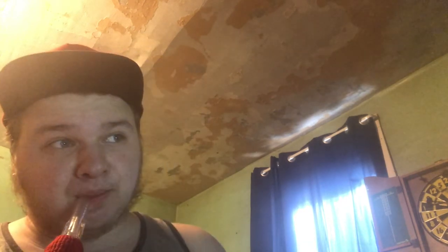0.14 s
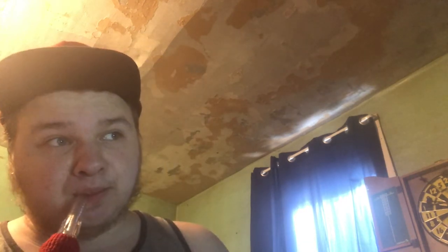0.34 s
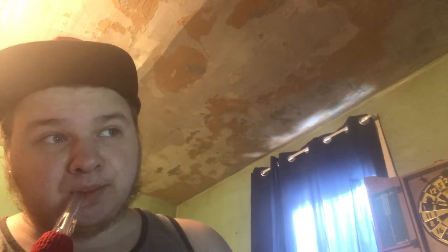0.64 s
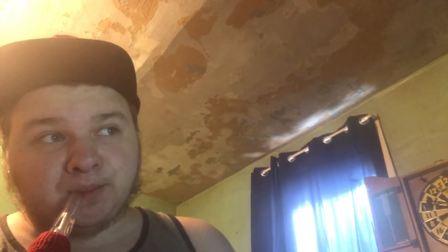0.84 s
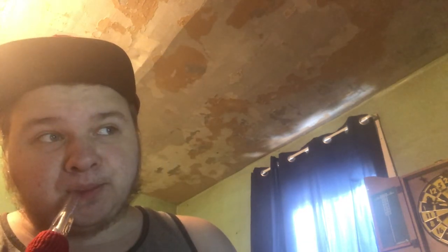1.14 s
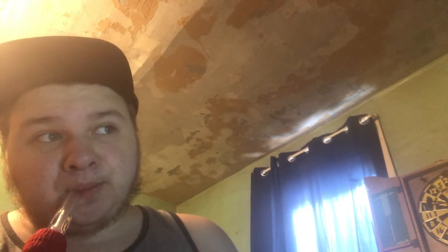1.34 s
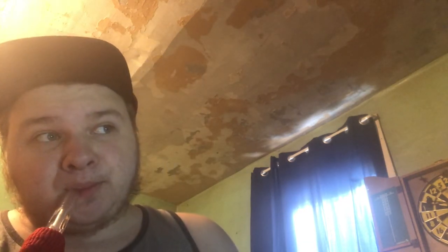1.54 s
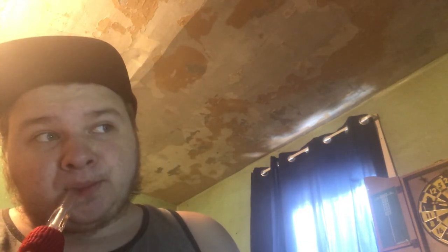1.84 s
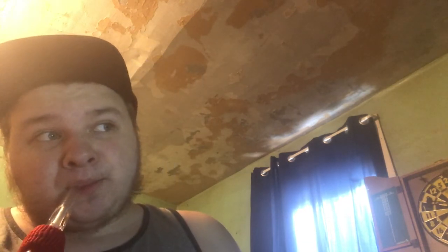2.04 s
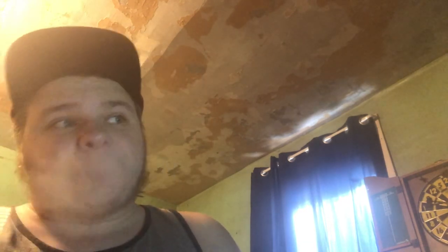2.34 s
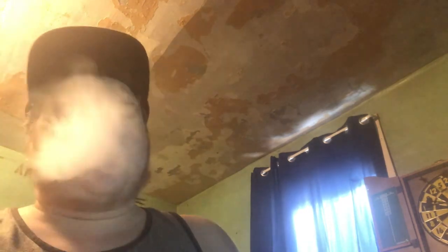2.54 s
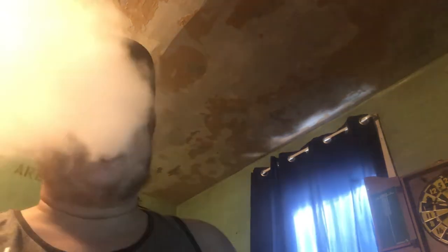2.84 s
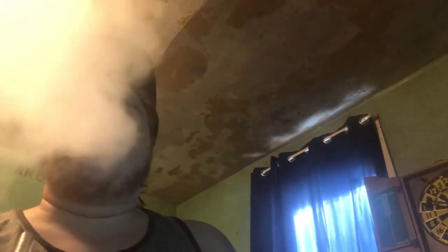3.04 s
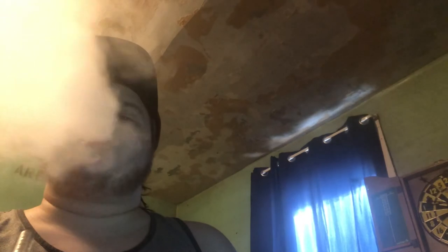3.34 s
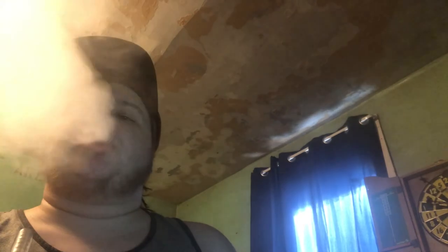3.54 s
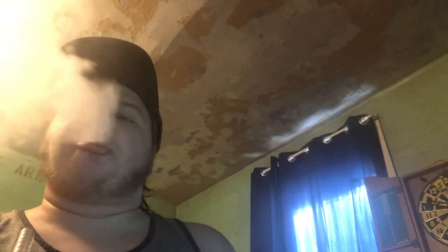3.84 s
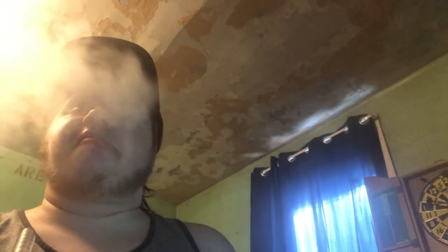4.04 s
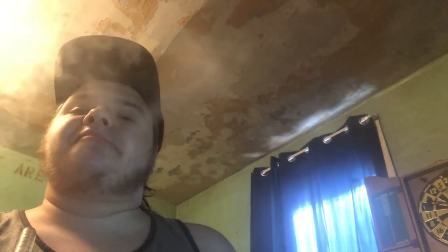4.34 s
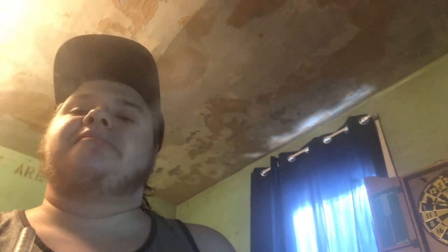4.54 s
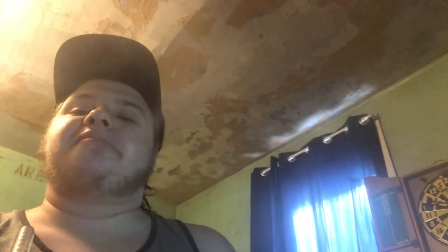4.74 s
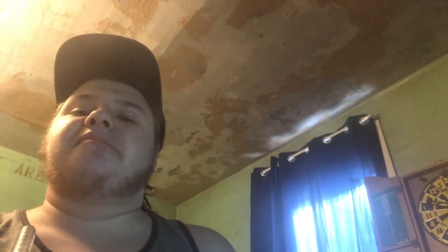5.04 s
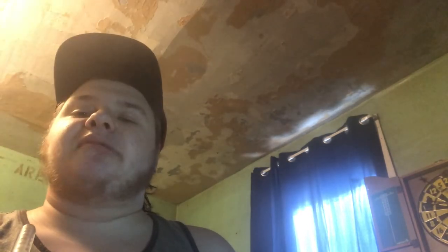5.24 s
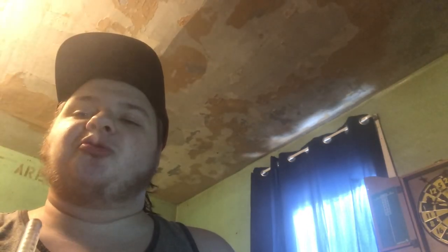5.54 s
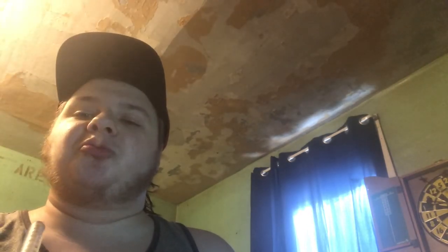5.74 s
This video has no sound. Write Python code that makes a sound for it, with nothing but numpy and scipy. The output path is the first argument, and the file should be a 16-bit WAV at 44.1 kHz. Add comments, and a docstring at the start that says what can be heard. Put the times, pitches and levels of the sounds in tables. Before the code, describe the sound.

Quick hollow gurgling pops as air is pulled through a water pipe, a faint hose bump, then only a low droning fan.

```python
"""A hookah beside a fan

Air is drawn through a hookah for two seconds: about fourteen times a second a bubble breaks from the stem.
Each pops with a short rising note that rings the vase, and the water throbs; small drops spatter in between.
The mouthpiece ticks faintly and the hose is put down with a soft bump, a short sine of falling pitch.
A fan hums with wavering sines and rushes with shaped noise in the small room throughout."""
import sys
import numpy as np
from scipy import signal
from scipy.fft import rfft, irfft, next_fast_len
from scipy.io import wavfile
from scipy.ndimage import map_coordinates

SR = 44100
rng = np.random.default_rng(int(sys.argv[2]) if len(sys.argv) > 2 else 0)


def transcribe(signal):
    """Save signal, clipped to [-1, 1], as a 16-bit WAV file at the path in sys.argv[1]."""
    frames = np.atleast_2d(signal).T
    limited = np.clip(frames, -1, 1)
    pcm = np.round(limited * 32767).astype(np.int16)
    wavfile.write(sys.argv[1], SR, pcm)


N = 260190  # length in samples
DRAW_END_S = 1.9  # from here the suction lets go


def amp(db):
    """Turn decibels into a gain."""
    return 10 ** (np.asarray(db) / 20)


def unit(x):
    """Scale x to an average (rms) strength of 1."""
    return x / np.sqrt(np.mean(x ** 2) + 1e-20)


def along(points, hz):
    """Read a curve of (Hz, value) points at any frequency, on a log axis."""
    f, v = np.transpose(points)
    return np.interp(np.log(hz + 1), np.log(f + 1), v)


def wobble(rate):
    """Draw a smooth random curve through `rate` random points a second."""
    knots = rng.standard_normal(int(N * rate / SR) + 4)
    return map_coordinates(knots, [np.arange(N) * rate / SR])


def filtered(x, response):
    """Multiply the spectrum of x by a response that depends on frequency."""
    size = next_fast_len(len(x) + SR // 4)
    spectrum = rfft(x, size) * response(np.fft.rfftfreq(size, 1 / SR))
    return irfft(spectrum, size)[:len(x)]


def coloured(x, spectrum):
    """Shape x with a curve of (Hz, dB) points, then scale it to rms 1."""
    return unit(filtered(x, lambda hz: amp(along(spectrum, hz))))


def add(track, s, sound):
    """Mix a sound into the track from time s in seconds."""
    part = track[max(round(s * SR), 0):][:len(sound)]
    part += sound[:len(part)]


def ring(hz, db, t60, attack, glide=0):
    """Sum fading sines with a soft start; t60 is the time to fall 60 dB, glide the relative pitch rise a second."""
    t = np.arange(SR // 3) / SR
    hz, db, t60 = (np.reshape(v, (-1, 1)) for v in (hz, db, t60))
    fade = amp(db - 60 * t / t60)
    modes = fade * np.sin(2 * np.pi * hz * (t + glide * t * t / 2))
    return modes.sum(axis=0) * (1 - np.exp(-t / attack))


def fan(sway=0.16, flutter_db=0.61, tone_sway=0.69, tone_flutter_db=1.5, low_db=-47, air_db=-48.0,
        low_edge_hz=650, blade_hz=168.4):
    """The blades hum a strong wavering tone over weak unsteady motor tones and the rush of moved air."""
    # Level of the hum, with slow drifts and a few quick dips. Each row: time in seconds, level in dB rms.
    hum_levels = [(0, -37), (.3, -33), (.4, -40), (.65, -34), (1.5, -34.5), (2.0, -33.5), (4.0, -35),
                  (4.15, -32.5), (4.7, -36), (4.9, -32.5), (5.65, -33.5), (5.9, -35)]
    # Weaker tones of the fan and its motor. Each row: pitch in Hz, level in dB rms.
    weak_tones = [(120, -61.5), (127, -58.5), (210.3, -60.5), (378.7, -58), (505, -64), (673, -77.5),
                  (757.5, -71), (841.5, -80), (1010, -68.5), (1136.3, -57.5), (1346.5, -63.5),
                  (1515, -67.5)]
    # Shape of the low rumble. Each row: frequency in Hz, relative level in dB per Hz.
    low_spectrum = [(20, -36), (30, -27), (45, -4.5), (70, 0.5), (90, 6), (135, 7.5), (172, 18.5), (195, 8),
                    (235, 8), (260, 5), (390, 3.5), (435, -3.5), (495, 6.5), (540, -6.5), (575, 6.5),
                    (640, -31.5)]
    # Shape of the air rush. Each row: frequency in Hz, relative level in dB per Hz.
    air_spectrum = [(500, -42), (640, -3), (745, -9.5), (790, -1.5), (890, 5), (1000, -3.5), (1270, -2),
                    (1500, -7.5), (1800, -11), (2050, -17), (3000, -17.5), (4500, -19), (5200, -24.5),
                    (7000, -26.5), (8200, -30.5), (10000, -31.5), (13000, -38), (15700, -44)]
    t = np.arange(N) / SR
    turn = 2 * np.pi * t
    blade_db = np.interp(t, *np.transpose(hum_levels)) + flutter_db * wobble(16)
    blade = amp(blade_db) * np.sin(blade_hz * turn + sway * wobble(8))
    tones = np.zeros(N)
    for hz, db in weak_tones:
        level = amp(db + tone_flutter_db * wobble(4.89))
        tones += level * np.sin(hz * turn + tone_sway * wobble(4))
    rumble = coloured(rng.standard_normal(N), low_spectrum)
    rumble = filtered(rumble, lambda hz: 1 / (1 + (hz / low_edge_hz) ** 20))
    air = coloured(rng.standard_normal(N), air_spectrum)
    # a sine of peak sqrt(2) has rms 1
    return np.sqrt(2) * (blade + tones) + amp(low_db) * rumble + amp(air_db) * air


def draw(peak_s=1.13, swell_db_per_s=4.5, release_db_per_s=80):
    """The suction swells to a peak, eases off, then lets go: dB relative to a full peak, for each sample."""
    t = np.arange(N) / SR
    swell_db = -swell_db_per_s * np.abs(t - peak_s)
    return swell_db - release_db_per_s * np.maximum(t - DRAW_END_S, 0)


def churn(rate=350, level_db=-45):
    """Small bubbles and drops spatter in the vase: about `rate` random clicks a second, shaped and faded by the draw."""
    # Shape of the spatter. Each row: frequency in Hz, relative level in dB per Hz.
    spatter_spectrum = [(35, -28), (60, -15), (95, -4.5), (150, 10.5), (250, 3.5), (320, -9.5), (420, -15),
                        (510, -8), (680, -4), (750, -21), (870, 2), (1050, -20), (1200, -16), (1600, -20),
                        (2100, -36), (3000, -36), (3500, -18), (4000, -32), (10000, -65)]
    drops = (rng.random(N) < rate / SR) * rng.standard_normal(N)
    return amp(draw() + level_db) * coloured(drops, spatter_spectrum)


def blips(count=75, level_db=-39, pitch_hz=950, spread=0.283, cycles=22, rise=6):
    """Tiny bubbles at random times each sound one rising note that fades 60 dB in about `cycles` swings."""
    out, draw_db = np.zeros(N), draw()
    starts = rng.uniform(0, DRAW_END_S, count)
    for s, size in zip(starts, rng.standard_normal(count)):
        hz = pitch_hz * np.exp(spread * size)
        note = ring(hz, level_db + draw_db[int(s * SR)], cycles / hz, attack=0.0016, glide=rise)
        add(out, s, note)
    return out


def bubble_train(jitter_s=.006, size_db=-0.5, spread=0.076, beat_s=.069, shed_share=.6, shed_db=-11):
    """Bubbles break off near a beat: big ones, small ones on the beats between, and weaker ones shed behind."""
    # The big bubbles. Each row: start in seconds, pop level in dB, own pitch in Hz,
    # brightness in dB before the offset shared by all pops.
    big_bubbles = [(0.014, -17.5, 913, -20), (0.086, -25.5, 825, -18.5), (0.152, -24.5, 930, -21),
                   (0.307, -19, 886, -13.5), (0.349, -33, 926, -28), (0.388, -27, 1014, -29),
                   (0.462, -24.5, 900, -35), (0.534, -25.5, 840, -21), (0.6, -23.5, 543, -17.5),
                   (0.664, -34, 830, -27), (0.73, -26.5, 880, -17), (0.796, -29.5, 905, -21),
                   (0.863, -24.5, 850, -30), (0.982, -27, 872, -21), (0.998, -30.5, 920, -20),
                   (1.048, -32.5, 848, -16), (1.117, -21, 920, -23), (1.188, -31, 1040, -29),
                   (1.28, -24.5, 887, -27), (1.387, -19, 907, -33), (1.459, -21, 910, -29),
                   (1.471, -25.5, 920, -26), (1.523, -30, 976, -21), (1.63, -32.5, 859, -16),
                   (1.676, -28.5, 890, -21), (1.81, -27, 890, -21), (1.887, -24, 905, -11),
                   (2.002, -30, 864, -14), (2.113, -32, 900, -22)]
    small_db, small_hz, small_edge_db = -33.5, 913, -24
    rows, draw_db = list(big_bubbles), draw()
    chances = rng.standard_normal((len(big_bubbles), 4, 3))
    for (start, *_), (end, *_), chance in zip(big_bubbles, big_bubbles[1:], chances):
        steps = max(round((end - start) / beat_s), 1)
        beats = np.linspace(start, end, steps + 1)[1:-1]
        for s, (late, size, shift) in zip(beats, chance):
            db = small_db + draw_db[int(s * SR)] + size_db * size
            rows.append((s + jitter_s * late, db, small_hz * np.exp(spread * shift), small_edge_db))
    lucks = rng.random((len(big_bubbles), 2))
    for (s, db, *_), (luck, late), shift in zip(big_bubbles, lucks, rng.standard_normal(len(big_bubbles))):
        if luck < shed_share:
            shed_s = s + np.interp(late, [0, 1], (.012, .026))  # 12 to 26 ms behind
            rows.append((shed_s, db + shed_db, small_hz * np.exp(spread * shift), small_edge_db))
    return rows


def muffled(x, edge_hz=1950):
    """The closed vase lets little treble out."""
    return signal.sosfilt(signal.butter(6, edge_hz, fs=SR, output="sos"), x)


def pops(bubbles, level_db=-5, edge_db=16.0, detune=0.019, scatter_db=1, own_db=2, own_t60=0.032, rise=4,
         snap_db=-2, snap_hz=1580, snap_t60=0.0069, splash_db=-31, splash_t60=0.04):
    """Each bubble bursts with a snap and a little splash, sounds its own short rising note and rings the vase."""
    # Air space of the vase. Each row: pitch in Hz, relative level in dB, time to fall 60 dB in seconds.
    vase_modes = [(272, -6.5, 0.016), (308, -6, 0.059), (515, -14, 0.22), (582, 3.5, 0.024),
                  (690, 5.5, 0.025), (852, -7, 0.072), (905, -3.5, 0.043), (1002, -7, 0.079),
                  (1255, -4, 0.034), (1560, -8, 0.036), (1770, -16, 0.044)]
    # low modes of a pop of usual strength, relative to its main note
    usual_db, hollow_base_db, hollow_per_db, hollow_per_bright = -26, -6, -.5, 0.15
    spray_spectrum = [(500, -7), (1800, 13), (3200, -9), (5000, -30), (9000, -55)]  # (Hz, relative dB)
    out, t = np.zeros(N), np.arange(SR // 3) / SR
    hz, db, t60 = np.transpose(vase_modes)
    chance = rng.standard_normal((len(bubbles), 2, len(vase_modes)))
    for (s, peak_db, pitch_hz, high_db), (shift, strength) in zip(bubbles, chance):
        note = ring(pitch_hz, own_db, own_t60, attack=0.0023, glide=rise)
        # weak pops favour the low modes, as bright ones do a little; bright ones also lift the high modes
        bright_db = high_db + edge_db
        hollow_db = hollow_base_db + hollow_per_db * (peak_db - usual_db) + hollow_per_bright * bright_db
        colour = along([(680, hollow_db), (830, 0), (1100, 0), (1500, bright_db)], hz)
        # the moving water shifts every mode a little
        mode_hz = hz * (1 + detune * shift)
        mode_db = level_db + db + colour + scatter_db * strength
        vase = ring(mode_hz, mode_db, t60, attack=0.00058)
        snap = ring(snap_hz, snap_db + bright_db, snap_t60, attack=0.0027)
        spray = coloured(rng.standard_normal(len(t)), spray_spectrum)
        splash = amp(splash_db + bright_db - 60 * t / splash_t60) * spray
        add(out, s, amp(peak_db) * (muffled(note + vase + snap) + splash))
    return out


def gulps(bubbles, level_db=-35, follow=0.32, detune=0.0885):
    """Water falls back behind each bubble and sets trapped air throbbing, more after a big one and in a hard draw."""
    # Rocking water and the air above it. Each row: pitch in Hz, relative level in dB,
    # time to fall 60 dB in seconds.
    water_modes = [(105.4, 2.5, 0.25), (141, 1.5, 0.16), (169.7, 13.5, 0.13), (248, 10.5, 0.1)]
    out, draw_db = np.zeros(N), draw()
    hz, db, t60 = np.transpose(water_modes)
    shifts = rng.standard_normal((len(bubbles), len(water_modes)))
    for (s, peak_db, *_), shift in zip(bubbles, shifts):
        gain = amp(level_db + follow * peak_db + draw_db[int(s * SR)])
        add(out, s, gain * ring(hz * (1 + detune * shift), db, t60, attack=0.006))
    return out


def hose(bump_s=2.19, bump_hz=100, end_hz=50, bump_db=-37, bump_length=0.059, pivot_hz=11600):
    """The mouthpiece ticks with fading bands of noise and the hose gives one soft bump of falling pitch."""
    # Small ticks. Each row: start in seconds, level in dB, brightness in dB per octave.
    tick_rows = [(1.06, -63, -14), (1.33, -67, -14), (2.069, -56, 5), (2.096, -61, 6), (2.111, -64, -8),
                 (2.457, -66, 4), (2.464, -63, 4)]
    # What the mouthpiece rings with. Each row: centre in Hz, width to either side in Hz,
    # relative level in dB, time to fall 60 dB in seconds.
    mouthpiece_bands = [(7870, 280, -8.5, 0.19), (11600, 1600, -1, .035), (14400, 400, -14, .06)]
    out, t = np.zeros(N), np.arange(SR // 4) / SR
    for s, tick_db, tilt in tick_rows:
        for centre_hz, width_hz, db, t60 in mouthpiece_bands:
            noise = rng.standard_normal(len(t))
            grain = filtered(noise, lambda hz: 1 / (1 + ((hz - centre_hz) / width_hz) ** 2))
            tilt_db = tilt * np.log2(centre_hz / pivot_hz)
            add(out, s, amp(tick_db + db + tilt_db - 60 * t / t60) * unit(grain))
    progress = np.minimum(t / bump_length, 1)
    phase = 2 * np.pi * np.cumsum(bump_hz + (end_hz - bump_hz) * progress) / SR
    add(out, bump_s, amp(bump_db) * np.sin(np.pi * progress) ** 2 * np.sin(phase))
    return out


def room(x, delay=.007):
    """The walls answer after `delay` seconds with a short noise tail that dies sooner in the treble."""
    # Fading of the room. Each row: frequency in Hz, time to fall 60 dB in seconds.
    decay_times = [(150, 0.43), (1000, 0.21), (10000, 0.1)]
    hz, t, z = signal.stft(rng.standard_normal(SR // 2), SR, nperseg=256)
    fade = amp(-60 * t / along(decay_times, hz)[:, None])
    tail = signal.istft(z * fade, SR, nperseg=256)[1]
    delayed = np.pad(x, (int(delay * SR), 0))
    return signal.fftconvolve(delayed, tail / np.linalg.norm(tail))[:N]


def scene(room_db=-11):
    """Mix the sounds: only the pops, blips and gulps get an answer from the room; fan, hose and churn stay dry."""
    background = fan() + hose() + churn()
    bubbles = bubble_train()
    water = blips() + pops(bubbles) + gulps(bubbles)
    return (water + amp(room_db) * room(water) + background)[None]


def record(dry, bass_hz=36, top_hz=15720):
    """The microphone drops the deep bass and keeps nothing above its band limit."""
    return filtered(dry[0], lambda hz: np.minimum(hz / bass_hz, 1) ** 2 * (hz < top_hz))[None]


dry = scene()
out = record(dry)
transcribe(out)
```